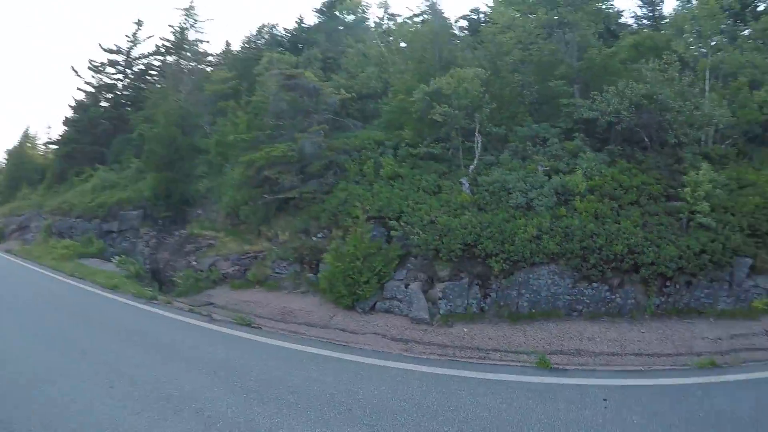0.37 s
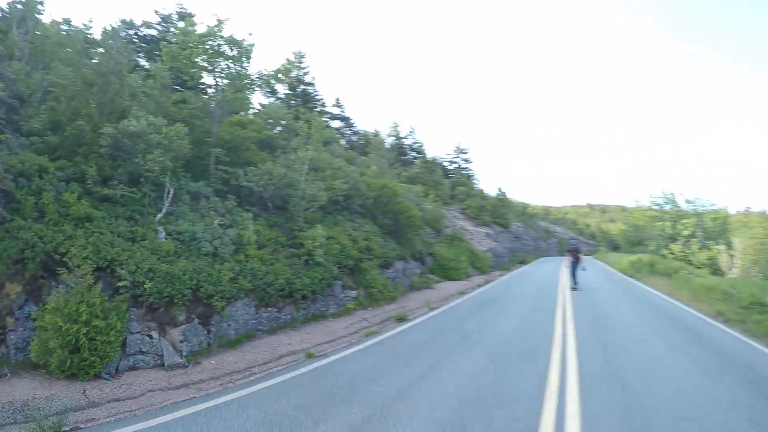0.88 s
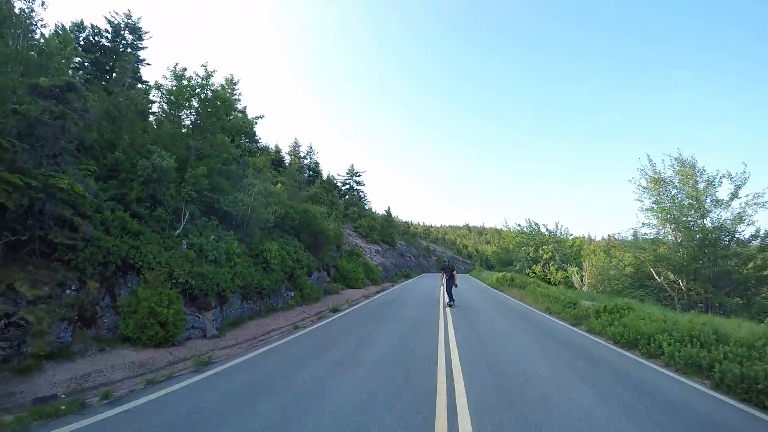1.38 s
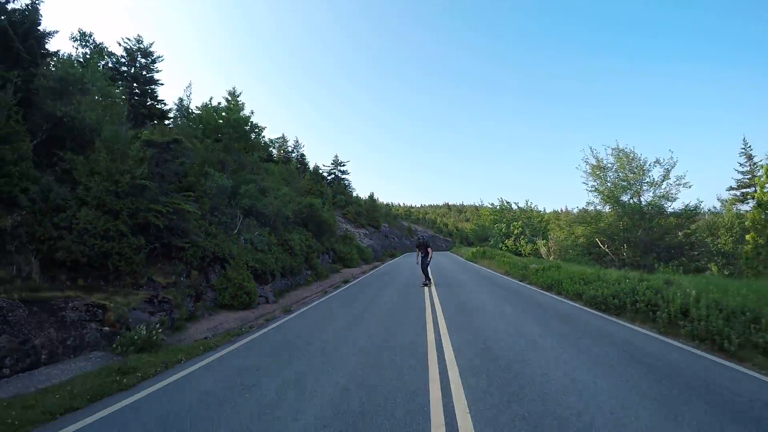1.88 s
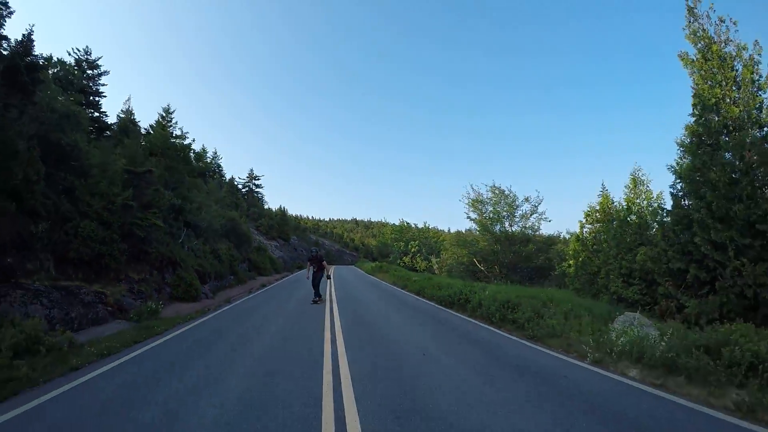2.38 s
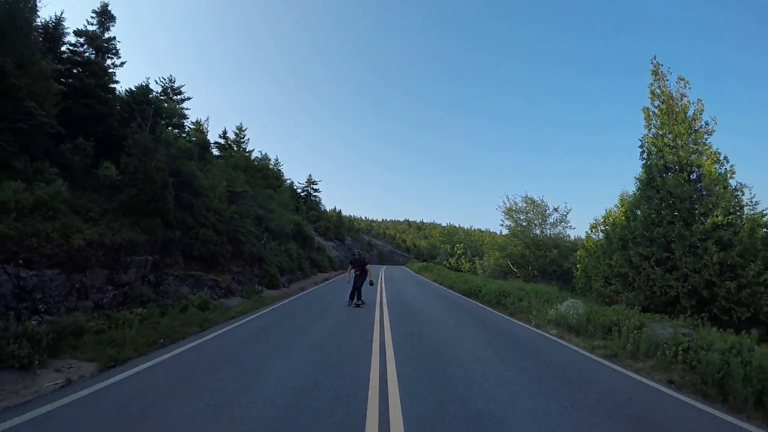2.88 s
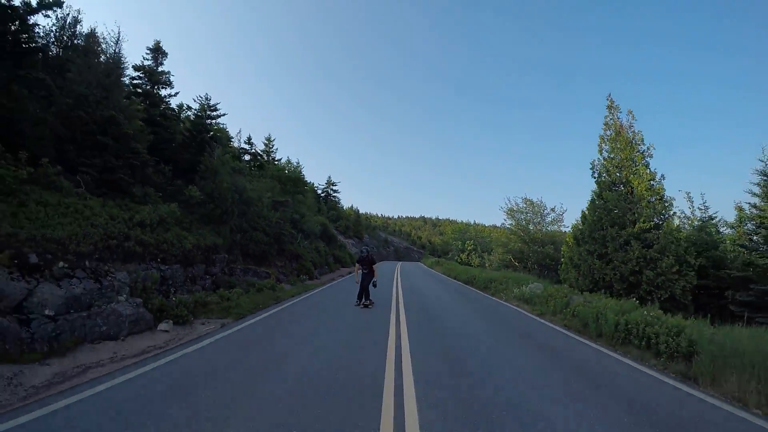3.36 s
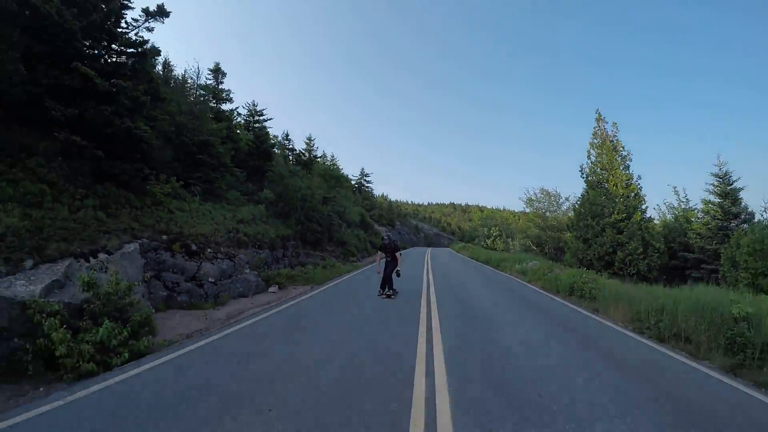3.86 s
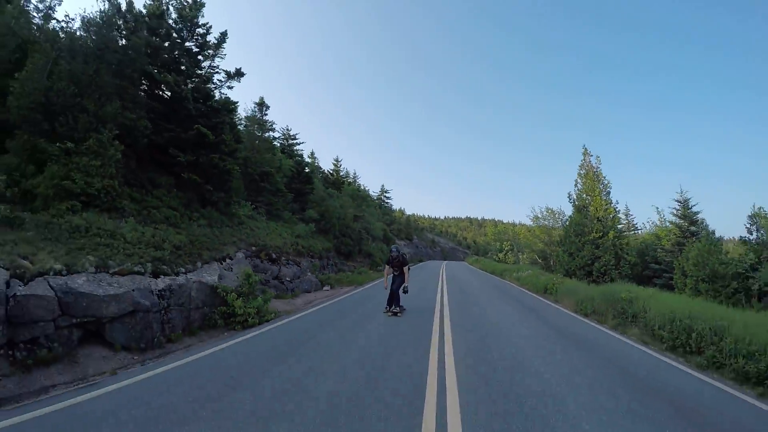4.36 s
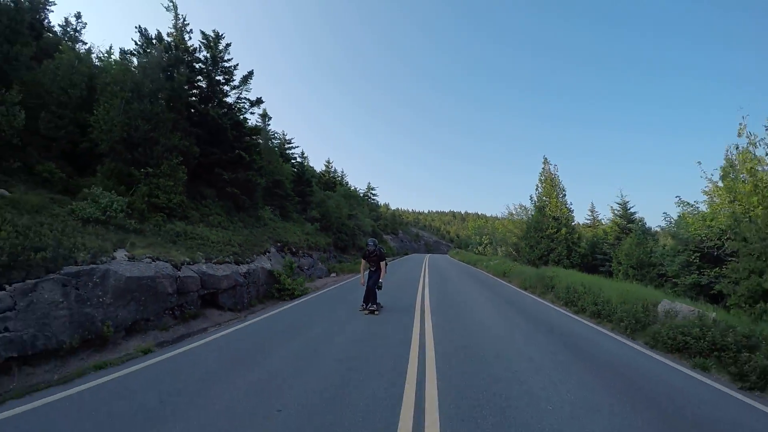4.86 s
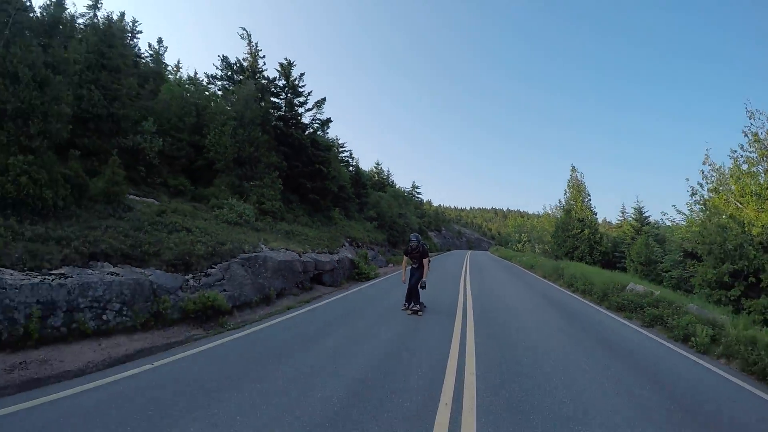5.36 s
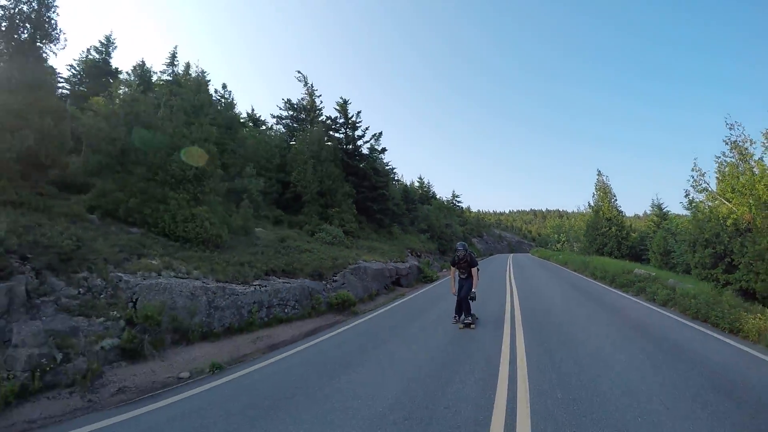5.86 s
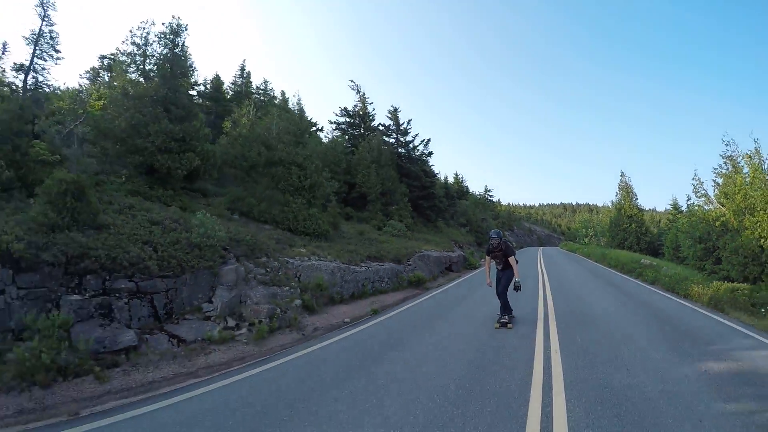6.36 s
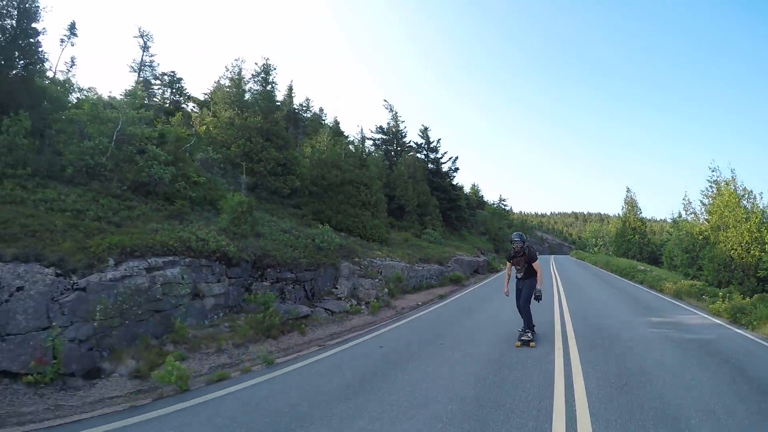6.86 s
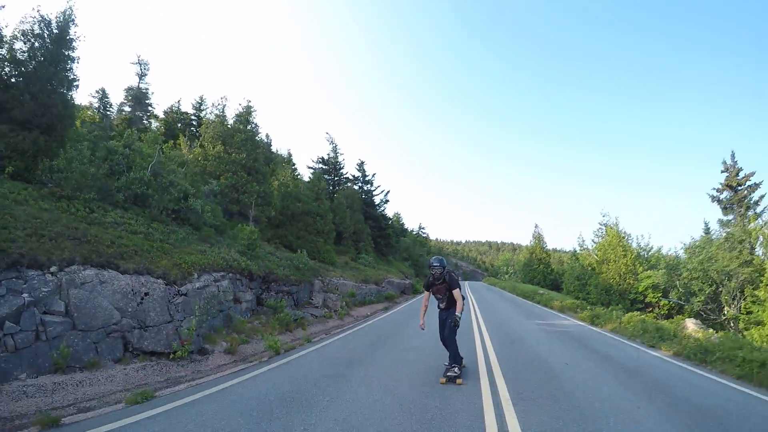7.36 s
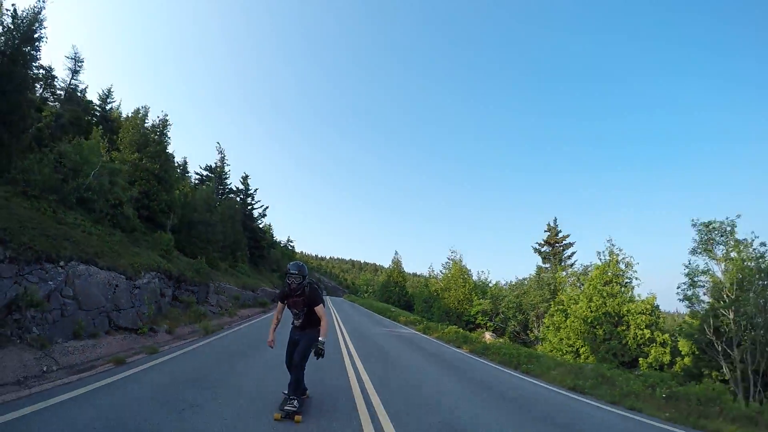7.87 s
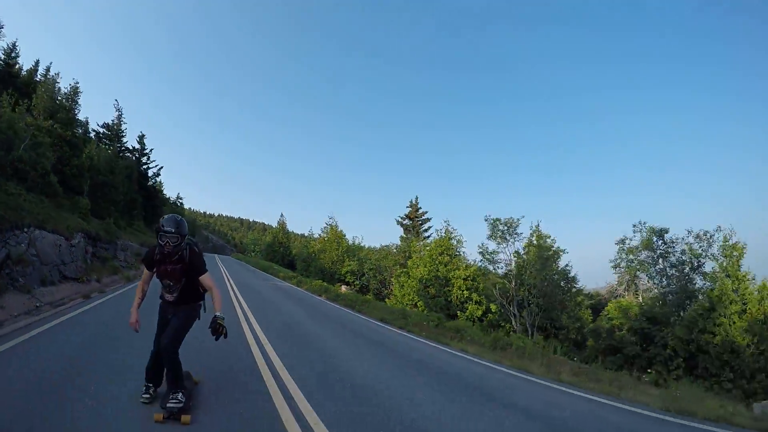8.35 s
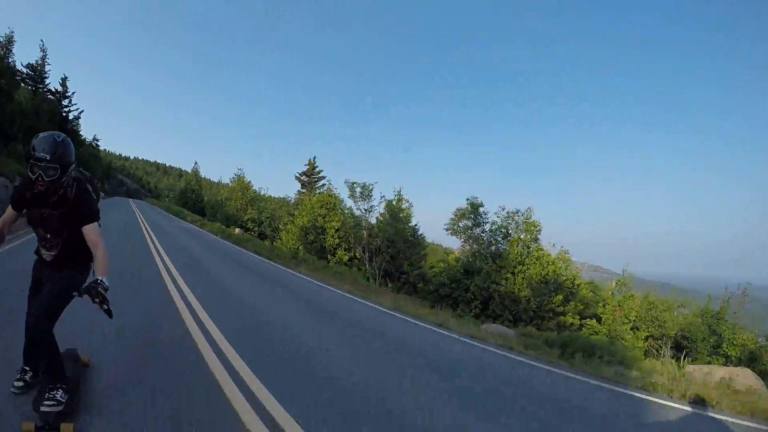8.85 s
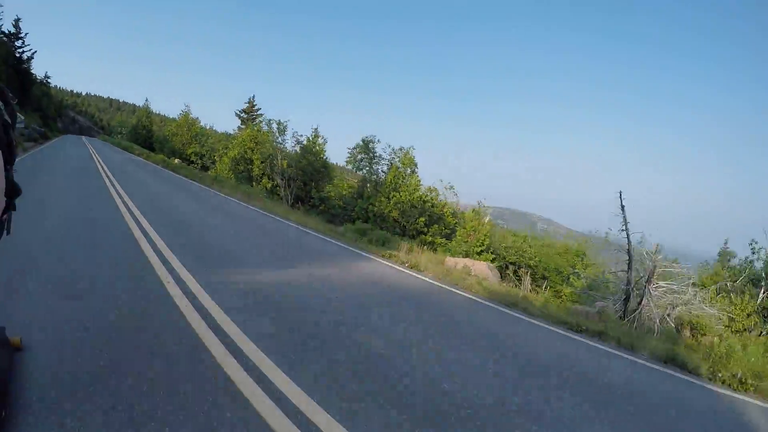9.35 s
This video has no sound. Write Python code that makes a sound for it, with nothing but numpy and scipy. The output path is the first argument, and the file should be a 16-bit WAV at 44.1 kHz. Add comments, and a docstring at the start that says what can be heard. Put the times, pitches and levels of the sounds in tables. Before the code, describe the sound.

A microphone in a plastic housing rolls down an open road ahead of a longboarder. Low wind throbs and flutters throughout. Wheel roar and hiss start strong, with a hard knock and heavy thumps in the first second, then recede beneath the wind. Scattered ticks rattle the case; near the end a second board's bright wheel hiss draws close.

```python
"""Longboards on a paved road, heard inside a rolling housing

A microphone in a plastic housing rolls fast down a paved road, ahead of a rider on a longboard.
Wind thumps, throbs and flutters at the port: banded noise driven by gusts, with single thuds on top.
Wheels roar, hum, hiss and sing on the asphalt as shaped noise; a second board draws near late on.
Grit and the mount tick against the housing, with one hard knock: short contacts ring its shell modes."""
import sys
import numpy as np
from scipy import signal
from scipy.fft import rfft, irfft, next_fast_len
from scipy.io import wavfile
from scipy.ndimage import uniform_filter1d

SR = 44100
rng = np.random.default_rng(int(sys.argv[2]) if len(sys.argv) > 2 else 0)


def undo_db(level):
    """Turn decibels back into plain size, where 20 dB means ten times bigger."""
    steps = np.asarray(level, float) / 20
    return 10 ** steps


def put_to_file(sound):
    """Save the sound as 16-bit audio at rate SR, in the file named by the first command-line argument."""
    columns = np.atleast_2d(sound).T  # one column per channel
    safe = np.clip(columns, -1, 1)
    whole_steps = np.round(safe * 32767)
    wavfile.write(sys.argv[1], SR, whole_steps.astype(np.int16))


N = 418068   # length in samples


def rms_one(x):
    """Scaled to unit rms."""
    return x / np.sqrt(np.mean(x ** 2) + 1e-20)


def in_time(rows):
    """Each column of a curve, sample by sample; the first column is time in seconds."""
    s, *columns = np.transpose(rows)
    return [np.interp(np.arange(N) / SR, s, column) for column in columns]


def flicker(rate_hz):
    """Noise twice through a one-pole low-pass, its slowest swells taken out, spread 1."""
    step = 20   # computed at every 20th sample
    r = np.exp(-2 * np.pi * rate_hz * step / SR)
    noise = rng.standard_normal(N // step + 2002)
    slow = signal.lfilter([1], [1, -2 * r, r * r], noise)[2000:]   # drop the filter's start
    slow = slow - uniform_filter1d(slow, size=SR // 80)   # swells longer than about 1/4 s
    return np.interp(np.arange(N) / step, np.arange(len(slow)), rms_one(slow))


def random_hits(per_s, spread_db, decay_s):
    """A gain that leaps at chance moments and dies away exponentially."""
    strength = undo_db(spread_db * np.minimum(rng.exponential(1, N), 4))
    hits = (rng.random(N) < per_s / SR) * strength
    fall = np.exp(-1 / (decay_s * SR))
    rise = np.exp(-1 / (0.00046 * SR))   # 0.46 ms rounds the leap
    dying = signal.lfilter([1], [1, -fall], hits + 1e-18)
    return signal.lfilter([1 - rise], [1, -rise], dying)


def banded(spectrum, shared_db, own_db, own_rate, tilt_db=0, pivot_hz=3500):
    """Unit-rms noise in half-octave bands: all follow a shared gain, each flickers by itself too."""
    size = next_fast_len(N)
    hz = np.maximum(np.arange(size // 2 + 1) * SR / size, 1)
    knots, level_db = np.transpose(spectrum)
    shape_db = np.interp(np.log(hz), np.log(knots), level_db, -120, -120)
    noise = rfft(rng.standard_normal(size)) * undo_db(shape_db)
    out = np.zeros(N)
    for centre in knots[0] * 2 ** np.arange(0, np.log2(knots[-1] / knots[0]) + .5, .5):
        share = np.clip(1 - 2 * np.abs(np.log2(hz / centre)), 0, 1)   # overlapping triangles sum to one
        gain_db = own_db * flicker(own_rate) + tilt_db * np.log2(centre / pivot_hz)
        out += irfft(noise * share, size)[:N] * undo_db(gain_db)
    return rms_one(out * undo_db(shared_db))


def beats_and_lulls():
    """Eddies shed in turn make the buffeting beat evenly; lulls drop the wind briefly. Gains in dB."""
    # spells of even beating: first_beat_s, length_s, beats_per_s, swing_db
    throbs = [(0.027, 0.076, 8.5, 13.5), (0.998, 0.55, 7.15, 3.5), (2.156, 0.21, 7.8, 7.5),
              (4.025, 0.25, 6.6, 3.5), (8.733, 0.28, 9.13, 8.5), (9.12, 0.085, 10, 7.5)]
    # brief drops of the wind: middle_s, length_s, depth_db
    lulls = [(1.603, 0.042, 7), (1.752, 0.15, 5), (5.25, 0.073, 3.5), (7.15, 0.038, 3), (8.108, 0.042, 14)]
    t = np.arange(N) / SR
    beats_db = np.zeros(N)
    for s, length, rate, swing_db in throbs:
        inside_s = np.minimum(t - s, s + length - t)
        fade = np.clip(1 + 2 * rate * inside_s, 0, 1)   # half a beat in and out
        beats_db += swing_db * np.cos(2 * np.pi * rate * (t - s)) * fade
    lulls_db = sum(-depth_db * np.exp(-(2 * (t - s) / length) ** 2) for s, length, depth_db in lulls)
    return beats_db, lulls_db


def flare(flutter):
    """The upper part of the flutter swells briefly into rough bursts."""
    # bursts: middle_s, length_s, rise_db
    flares = [(0.495, 0.063, 7.5), (0.558, 0.064, 7.5), (0.745, 0.013, 17.5), (2.653, 0.026, 9),
              (2.751, 0.025, 8.5), (2.80, 0.018, 1), (2.874, 0.015, 13), (6.586, 0.036, 6.5),
              (6.635, .016, 4), (6.67, .025, 8), (6.714, 0.041, 7)]
    t = np.arange(N) / SR
    rises_db = sum(rise_db * np.exp(-(2 * (t - s) / length) ** 4) for s, length, rise_db in flares)
    upper = signal.sosfilt(signal.butter(2, 240, "high", fs=SR, output="sos"), flutter)
    return flutter + (undo_db(rises_db) - 1) * upper


def wind(gust_db):
    """Large eddies push the diaphragm slowly; small ones burst over it as a ragged flutter."""
    # wind at the port, ahead of beats, lulls and flares: time_s, buffeting_db, flutter_db
    wind_levels = [(0.0, -30, -30), (0.05, -16.5, -26), (0.47, -13.5, -18.5), (0.66, -14.5, -20.5),
                   (0.74, -12, -19), (1.63, -16.5, -30), (2.24, -14.5, -24), (3.72, -13.5, -25),
                   (3.91, -25.5, -38.5), (4.01, -16, -22.5), (4.78, -10.5, -20.5), (4.86, -16, -24),
                   (6.65, -14, -18.5), (7.21, -16, -28), (7.26, -12.5, -19.5), (7.97, -14.5, -35),
                   (8.48, -13, -33), (8.58, -19.5, -36), (8.66, -16, -31.5), (9.08, -18.5, -30),
                   (9.24, -11.5, -25), (9.48, -25, -34)]
    # colour of the slow buffeting: pitch_hz, level_db (relative, per Hz)
    buffet_colour = [(12, -28), (22, 0), (32, 0.5), (50, -0.5), (75, -7.5), (120, -20), (250, -50),
                     (500, -33.5)]
    # colour of the flutter: pitch_hz, level_db (relative, per Hz)
    flutter_colour = [(50, -12.5), (90, 3.5), (130, -0.5), (250, -8), (500, -13.5), (900, -23),
                      (1200, -35.5), (1700, -50.5), (3000, -50.5)]
    buffet_db, flutter_db = in_time(wind_levels)

    buffet = banded(buffet_colour, 1.54 * gust_db, own_db=2.0, own_rate=4.0)
    swell = np.sqrt(uniform_filter1d(buffet ** 2, size=SR // 8) + .05)
    buffet = rms_one(buffet / swell ** 0.92)   # chance swells mostly levelled, the curve sets the strength

    bursts = 1.36 + random_hits(per_s=110, spread_db=1.5, decay_s=0.0071)
    burst_db = 20 * np.log10(bursts)
    flutter = banded(flutter_colour, 0.83 * gust_db + burst_db, own_db=1.5, own_rate=23)
    swell = np.sqrt(uniform_filter1d(flutter ** 2, size=SR // 6) + 0.056)
    flutter = flare(rms_one(flutter / swell))

    beats_db, lulls_db = beats_and_lulls()
    buffet_db = buffet_db + beats_db + lulls_db
    flutter_db = flutter_db + 0.19 * beats_db + 0.67 * lulls_db   # the flutter follows them only in part
    return undo_db(buffet_db) * buffet + undo_db(flutter_db) * flutter


def deck_hum():
    """The deck hums in a narrow band: slow complex noise turns a carrier of gliding pitch; unit rms."""
    # hum: time_s, pitch_hz, level_db (beside the roar)
    hum_curve = [(0, 643.7, -7.5), (1.5, 662.6, -10), (4.5, 646.3, -5.5), (5.5, 665, -4), (7.8, 656.3, -7),
                 (8.6, 652, -17), (9.48, 654, -20)]
    hum_hz, hum_db = in_time(hum_curve)
    r = np.exp(-np.pi * 26 / SR)   # 26 Hz wide
    waver = signal.lfilter([1], [1, -r], rng.standard_normal(N) + 1j * rng.standard_normal(N))
    hum = np.real(waver * np.exp(2j * np.pi * np.cumsum(hum_hz) / SR))
    return rms_one(hum), hum_db


def wheels(gust_db):
    """The deck roars with the coarse stones and hums; the tread hisses over the fine ones."""
    # wheels on asphalt, ahead of the housing: time_s, roar_db, hiss_db, hiss_tilt_db (per octave)
    wheel_levels = [(0.0, -28.5, -35, 6.5), (0.63, -30.5, -40, 7), (1.4, -38.5, -48.5, 4),
                    (1.77, -40.5, -47, 4), (2.27, -34, -41, 3.5), (2.51, -37, -47.5, 5.5),
                    (3.17, -43, -51, 6.5), (3.99, -38.5, -46.5, 4.5), (4.17, -37.5, -45.5, 4),
                    (4.57, -28.5, -38.5, 4), (4.88, -38, -47.5, 5.5), (5.7, -39, -46, 5),
                    (6.2, -35.5, -45, 4), (7.1, -35, -44.5, 3.5), (7.29, -32, -40.5, 4.5),
                    (8.4, -33, -38.5, 1), (8.61, -35.5, -46, -4), (9.03, -29.5, -41, -3),
                    (9.48, -33.5, -37.5, -2)]
    # colour of the roar: pitch_hz, level_db (relative, per Hz)
    roar_colour = [(150, -25), (300, 0), (420, 6.5), (600, 1.5), (950, -4), (1200, -9.5), (1600, -20),
                   (2500, -91)]
    # colour of the hiss: pitch_hz, level_db (relative, per Hz)
    hiss_colour = [(700, 15), (1300, 3.5), (2200, 5), (3000, 0), (5000, -4), (7000, -16.5), (9500, -30),
                   (12000, -41), (15500, -46.5)]
    roar_db, hiss_db, hiss_tilt_db = in_time(wheel_levels)

    roar_tilt_db = 0.6 + 0.093 * (roar_db + 30)   # dB per octave: a louder roar is brighter
    roar = banded(roar_colour, 0.57 * gust_db, own_db=1.0, own_rate=3.8,
                  tilt_db=roar_tilt_db, pivot_hz=700)

    stones = 1 + .27 * random_hits(per_s=35, spread_db=4.5, decay_s=.003)   # looser grit under the tread
    hiss = banded(hiss_colour, 0.27 * gust_db + 20 * np.log10(stones), own_db=1.0, own_rate=18.0,
                  tilt_db=hiss_tilt_db)

    hum, hum_db = deck_hum()
    hum_db = roar_db + hum_db + 0.65 * flicker(1.4)
    return undo_db(roar_db) * roar + undo_db(hiss_db) * hiss + undo_db(hum_db) * hum


def treble(gust_db):
    """The tread sings in a broad resonant band of noise; a thin hiss lies above everything."""
    # top of the sound: time_s, singing_db (ahead of a 6 dB cut), top_hiss_db, top_tilt_db (per octave)
    treble_levels = [(0.0, -35, -57, -8), (0.13, -33.5, -54.5, -11), (0.34, -37, -57, -3.5),
                     (0.45, -40, -57.5, -9), (0.7, -39.5, -59.5, -4.5), (1.45, -56, -78, -4),
                     (1.98, -56, -80, 0), (2.27, -42.5, -68, -1.5), (2.45, -48.5, -75, 2),
                     (3.8, -56.5, -75.5, 0), (4.57, -49.5, -74, 1), (4.78, -44.5, -67.5, 0),
                     (4.9, -53, -71.5, -8), (7.63, -52, -72.5, 1), (7.76, -39, -75, 1), (8.0, -49, -70, 0),
                     (8.36, -40, -67, -9), (8.385, -32, -64, -8), (8.47, -31, -63.5, -3),
                     (8.6, -36, -65, -3), (8.75, -32.5, -58, -1), (9.03, -39, -61.5, 1),
                     (9.16, -32.5, -56, 6), (9.48, -48, -60.5, 8)]
    # colour of the top hiss: pitch_hz, level_db (relative, per Hz)
    top_colour = [(9800, -20), (10800, -7), (11500, -3.5), (12500, -5), (13500, -5.5), (14600, -9),
                  (15400, -12)]
    sing_db, top_db, top_tilt_db = in_time(treble_levels)

    centre_hz, width_hz = 2600, 1200   # width of each of the two passes
    r = np.exp(-np.pi * width_hz / SR)
    sing = rng.standard_normal(N)
    for _ in range(2):
        sing = signal.lfilter([1, 0, -1], [1, -2 * r * np.cos(2 * np.pi * centre_hz / SR), r * r], sing)
    sing_db = sing_db - 6 + 1.1 * flicker(9.0)

    top = banded(top_colour, .6 * gust_db, own_db=2.0, own_rate=10.5,
                 tilt_db=top_tilt_db, pivot_hz=12000)
    return undo_db(sing_db) * rms_one(sing) + undo_db(top_db) * top


def housing(x):
    """The case around the microphone lifts and notches what passes through."""
    # resonances and dips of the case: pitch_hz, width_hz, gain_db
    case_bands = [(626, 40, 4), (893, 294, 7), (2680, 1100, 1.5), (3435, 150, -8), (4020, 650, 3.5),
                  (4500, 680, -7.5), (5450, 170, 2)]
    for hz, width_hz, db in case_bands:
        w, a = 2 * np.pi * hz / SR, undo_db(db / 2)
        k = np.pi * width_hz / SR
        above = [1 + k * a, -2 * np.cos(w), 1 - k * a]
        below = [1 + k / a, -2 * np.cos(w), 1 - k / a]
        x = signal.lfilter(above, below, x)
    return x


def strike(centre_hz, reach_octaves, fall_db, dull_db, rubbing, chatter_s, ring_share, peaky):
    """A contact rubs for a moment, then hits and rings the shell modes near its colour; peak 1."""
    # shell modes: pitch_hz, level_db (scaled by peaky), t60_s (scaled by ring_share)
    shell_modes = [(330, -12, .02), (500, 7, 0.046), (700, 2.5, 0.031), (910, 16, 0.031),
                   (1117, 3.5, 0.041), (1274, 5, 0.027), (1484, -3, 0.029), (1630, -2, 0.014),
                   (1897, 3, 0.028), (2100, 3.5, 0.025), (2330, 10.5, 0.012), (2600, 4.5, 0.024),
                   (2970, 14.5, 0.01), (3260, 1.5, 0.023), (3800, -8, 0.013), (5400, -10, 0.01),
                   (6150, -11, .007), (7500, -8, 0.005), (8200, -13, 0.0046)]
    hz, db, t60 = np.transpose(shell_modes)[:, :, None]
    t = np.arange(SR // 20) / SR
    sides = (-1.) ** np.arange(len(shell_modes))[:, None]   # neighbouring modes start in opposite directions
    rings = sides * np.sin(2 * np.pi * hz * t) * 1000. ** (-t / (ring_share * t60))

    off = np.log2(hz[:, 0] / centre_hz) / reach_octaves
    mode_db = peaky * db[:, 0] - fall_db * np.log2(1 + off ** 2) - dull_db * np.maximum(off, 0)
    chance_db = rng.standard_normal(len(shell_modes))
    struck = undo_db(mode_db + chance_db) @ rings

    rub = t[:SR // 100] / chatter_s
    # uneven rubbing that swells and lets go
    contact = rubbing * rng.standard_normal(SR // 100) * rub * np.exp(-rub)
    contact[round(chatter_s * SR)] += 3   # the blow itself, at the height of the rub
    soft = np.hanning(int(.18 * SR / centre_hz) + 3)   # dull contacts have blunter grains
    tick = np.convolve(np.convolve(contact, soft), struck)
    return tick / np.abs(tick).max()


def ticks():
    """Light ticks on the housing chatter, are quickly damped and stay near their colour."""
    # ticks: blow_s, peak_db, centre_hz (of the contact's colour)
    tick_list = [(.347, -24, 6040), (.618, -27, 2900), (0.631, -24, 4500), (0.641, -26, 3200),
                 (0.665, -19, 3600), (0.865, -28, 5400), (.924, -29, 594), (.931, -27, 3400),
                 (0.971, -26, 3500), (1.122, -32, 5500), (1.084, -19, 600), (1.283, -13.5, 600),
                 (1.284, -30, 2100), (1.463, -32, 1200), (1.739, -32, 700), (2.378, -23, 610),
                 (2.596, -15.5, 910), (2.598, -33, 1790), (2.615, -25, 700), (2.646, -20, 700),
                 (2.746, -21, 800), (2.751, -20, 700), (2.768, -22, 500), (2.795, -19.5, 800),
                 (2.84, -22, 604), (2.87, -19, 785), (2.873, -41, 1900), (2.904, -19.5, 700),
                 (2.906, -33, 1900), (2.958, -25, 604), (2.977, -15.5, 546), (2.977, -36, 1500),
                 (3.061, -29, 1400), (3.208, -23, 795), (3.55, -29, 1300), (3.701, -26, 1330),
                 (4.477, -27.5, 5050), (5.16, -29, 650), (5.643, -26, 2200), (5.647, -36, 2900),
                 (5.652, -31, 1800), (5.776, -31, 650), (6.215, -31, 600), (6.325, -23, 700),
                 (6.493, -29, 6200), (6.63, -28, 700), (6.708, -19, 1100), (6.718, -15, 800),
                 (6.727, -34, 1780), (6.999, -26, 2600), (7.108, -18, 900), (7.136, -23, 2950),
                 (7.26, -31, 2520)]
    out = np.zeros(N + SR)
    for s, peak_db, centre_hz in tick_list:
        chatter_s = 1.1 / centre_hz
        tick = strike(centre_hz, reach_octaves=.55, fall_db=10.0, dull_db=3.0, rubbing=.6,
                      chatter_s=chatter_s, ring_share=.45, peaky=.7)
        out[round((s - chatter_s) * SR):][:len(tick)] += undo_db(peak_db) * tick
    return out[:N]


def knock():
    """One clean hard blow rings the whole shell and bounces twice, weaker and blunter each time."""
    # the knock: start_s, peak_db, centre_hz (of its colour)
    hard_knock = (0.4003, 4.5, 1280)
    s, peak_db, centre_hz = hard_knock
    blow = strike(centre_hz, reach_octaves=0.86, fall_db=8.5, dull_db=-1.0, rubbing=0.08,
                  chatter_s=0.0005, ring_share=0.84, peaky=0.97)
    bounce_s, bounce_db = .0047, -8   # per bounce, before blunting
    out = np.zeros(N + SR)
    for k in range(3):
        blunted = uniform_filter1d(blow, size=1 + 6 * k)
        out[round((s + k * bounce_s) * SR):][:len(blow)] += undo_db(peak_db + k * bounce_db) * blunted
    return out[:N]


def thumps():
    """Each strong eddy at the port throws the diaphragm out and back, with a rounded start."""
    # single eddies: start_s, peak_db (nearly), pitch_hz
    thump_list = [(0.442, -7, 110), (0.461, -12, 150), (0.487, -5, 170), (0.51, -3, 121), (0.7465, -3, 280),
                  (0.744, 1.5, 71), (1.281, -10, 109), (2.631, -2.5, 100), (2.645, -8.5, 200),
                  (2.782, -6.5, 91), (5.346, -4, 154), (8.271, -5.5, 70), (9.254, -9.5, 264)]
    peak_at = 0.23   # cycles from the start to the crest of the envelope
    out = np.zeros(N + SR)
    for s, peak_db, hz in thump_list:
        cycles = np.arange(SR // 20) / SR * hz
        envelope = cycles / peak_at * np.exp(1 - cycles / peak_at)
        at = round(s * SR)
        out[at:at + len(cycles)] += undo_db(peak_db) * np.sin(2 * np.pi * cycles) * envelope
    return out[:N]


def second_board():
    """The second board draws level: wheel hiss close by, brighter, with a colour of its own."""
    # its hiss, ahead of the housing: time_s, level_db, tilt_db (per octave)
    near_levels = [(0, -76, -2), (7.2, -56, 0), (7.5, -64, 1), (7.8, -44.5, 0.5), (8.36, -44.5, 5),
                   (8.385, -41, 1), (8.6, -36.5, 0), (8.9, -36, 0), (9.15, -35.5, 1), (9.48, -38.5, 1)]
    # colour of its hiss: pitch_hz, level_db (relative, per Hz)
    near_colour = [(900, 6.5), (1300, 4.5), (1900, -13.5), (2550, -2.5), (3200, -8.5), (4100, 0),
                   (5300, -4.5), (6050, -11.5), (6250, -7), (6500, -10.5), (8500, -20.5), (10000, -27),
                   (12500, -28), (15500, -44)]
    level_db, tilt_db = in_time(near_levels)
    hiss = banded(near_colour, 1.2 * flicker(30), own_db=0.0, own_rate=15, tilt_db=tilt_db)
    return undo_db(level_db) * hiss


def scene():
    """Wind, wheels, ticks and the knock at one microphone; one gust signal ruffles wind and wheels."""
    gust_db = 0.45 * flicker(6.2) + 1.4 * flicker(50)
    at_port = wind(gust_db) + thumps()
    road = housing(wheels(gust_db) + second_board())
    return (at_port + road + treble(gust_db) + ticks() + knock())[None]


def band_limit(x):
    """A steep low-pass at the top of the band."""
    return signal.sosfilt(signal.butter(12, 15300, fs=SR, output="sos"), x)


def record(dry):
    """Peaks bend smoothly towards a ceiling of 0.97 of full scale."""
    mix = dry / (1 + np.abs(dry / .97) ** 8) ** (1 / 8)
    return band_limit(mix)


dry = scene()
out = record(dry)
put_to_file(out)
```